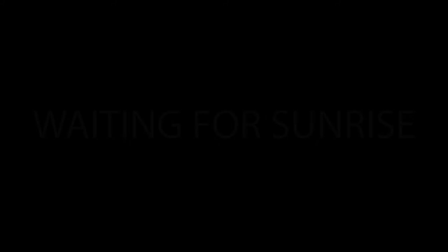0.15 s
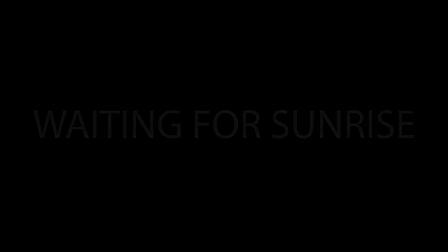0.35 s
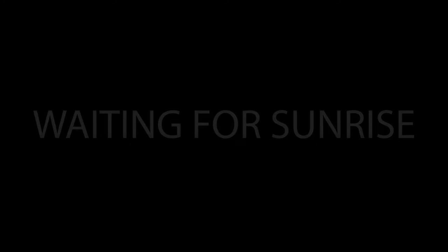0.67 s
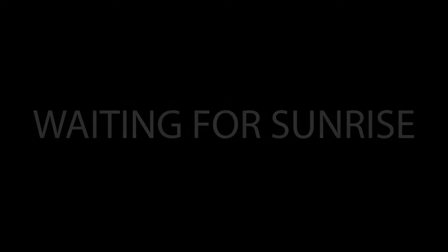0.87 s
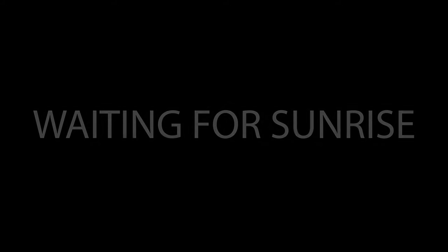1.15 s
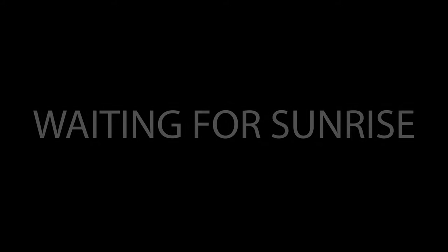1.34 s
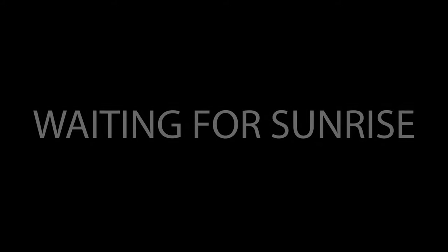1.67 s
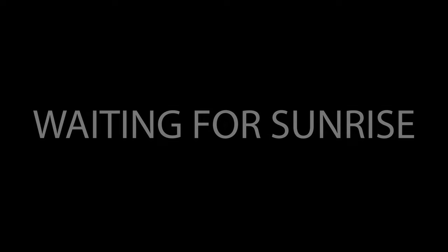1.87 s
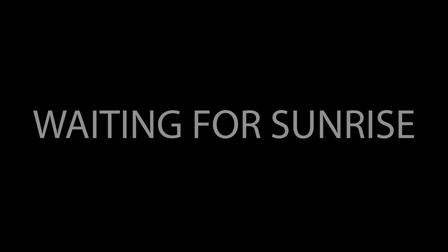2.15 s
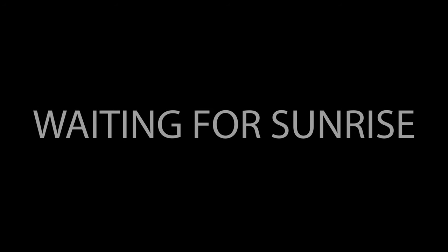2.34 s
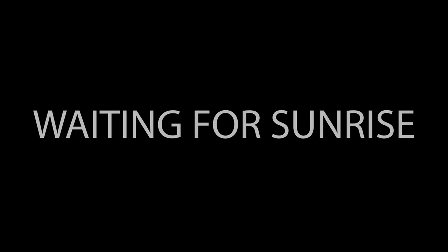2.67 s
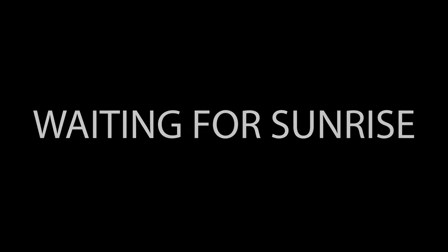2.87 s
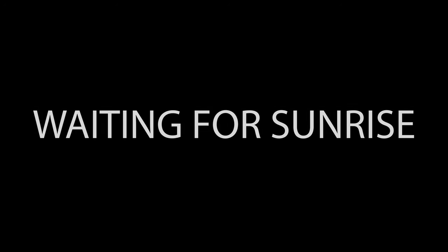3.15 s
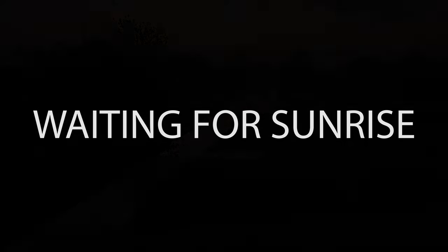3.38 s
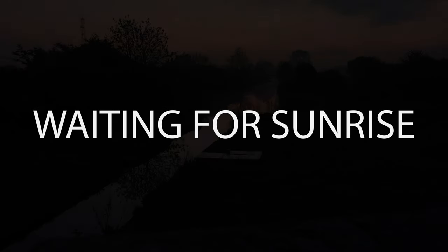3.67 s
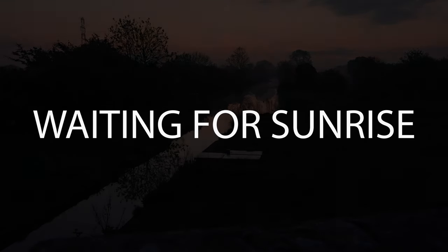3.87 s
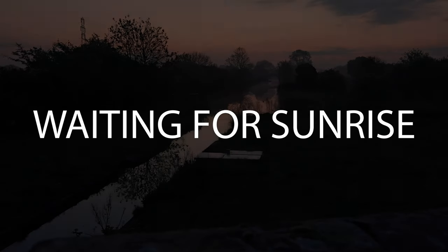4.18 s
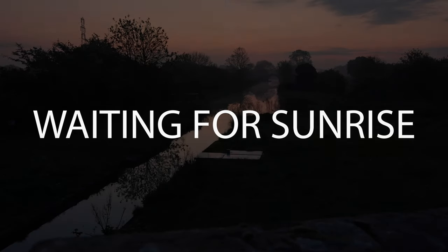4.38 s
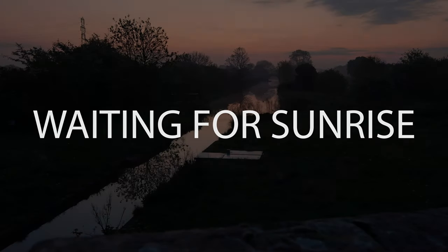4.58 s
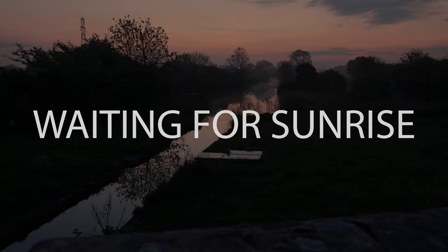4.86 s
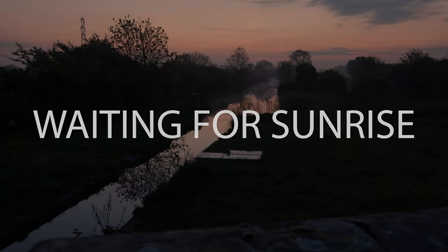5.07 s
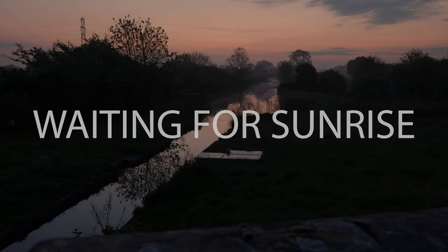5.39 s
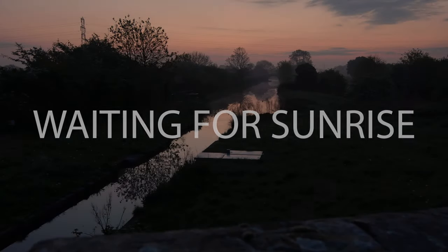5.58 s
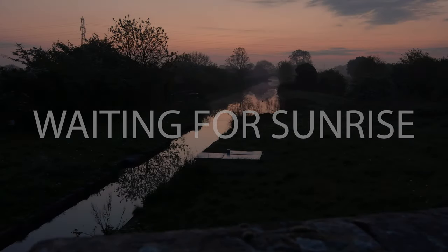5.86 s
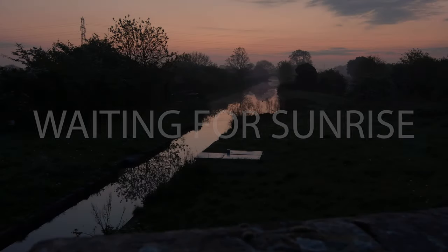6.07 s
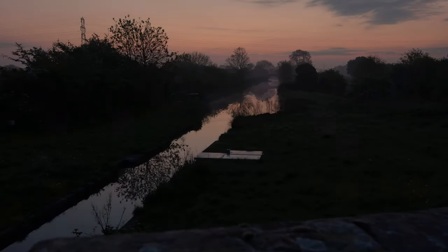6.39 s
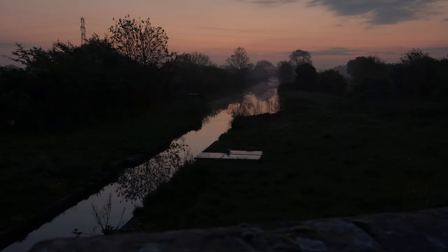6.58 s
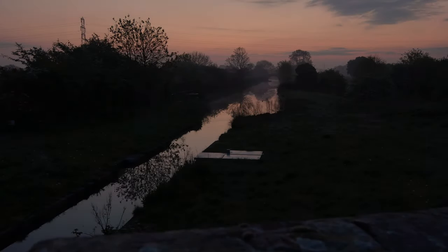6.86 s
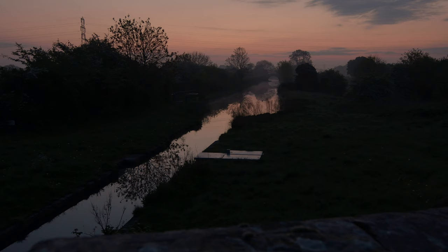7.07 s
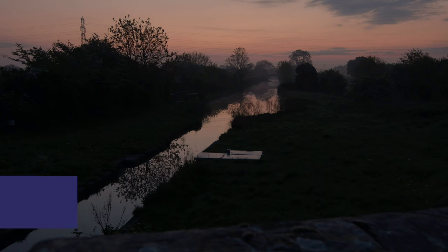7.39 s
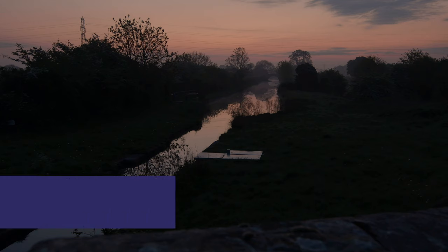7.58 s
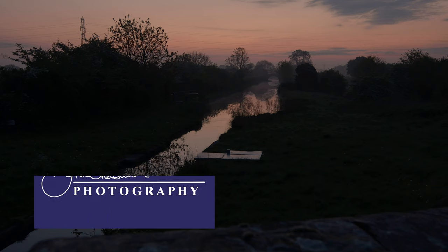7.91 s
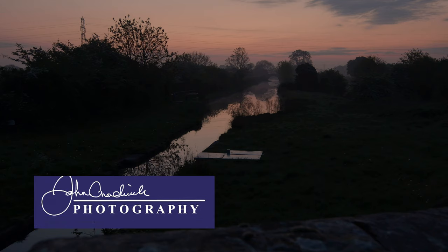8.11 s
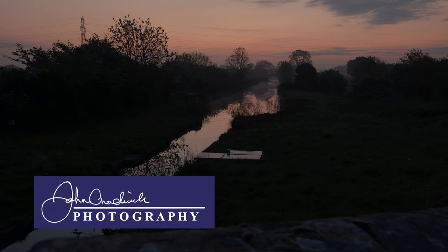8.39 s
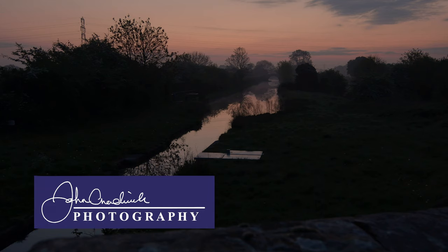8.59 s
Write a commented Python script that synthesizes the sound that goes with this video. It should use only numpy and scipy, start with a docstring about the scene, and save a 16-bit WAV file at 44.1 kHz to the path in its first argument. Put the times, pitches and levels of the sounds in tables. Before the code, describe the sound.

A dense dawn chorus beside a tree-lined canal, lasting nearly nine seconds. From the start, far birds blur together over a quiet low rumble and soft hiss, while a small bird repeats a quick hooked chirp about seven times in the first second. Falling slurs, thin whistles and mellow short notes join. Around 1.6 s a blackbird gives soft fluting notes; from 2 to 3 s a robin adds very high, thin arched figures. The tangle thickens from 3.5 to 4.7 s with clearer, louder blackbird scoops and warbles. Near 5 s the robin utters two fast, complex, wide-swinging phrases. From 5.3 to 7.5 s the chorus is somewhat sparser, with scattered whistles and warbles. At 7.8 s the blackbird returns strongly, warbles around 8.4 s, and ends near 8.7 s in a brief reedy squeak. Woodland reverberation softens everything; rumble and hiss grow slightly, then hold.

```python
"""Dawn chorus by a canal. From the start far birds blur together among trees, over rumble and hiss that rise slowly.
Small birds repeat hooked syllables, then slurs, amid mellow, thin and warbled notes: all are gliding tones.
From 1.6 s a blackbird flutes in scooped notes; from 2 s a robin throws thin arched figures.
About 5 s the robin sings with two voices at once; the blackbird returns near 8 s and ends in a reedy squeak.
The near voices are also heard as scatter from twigs and trees, made by convolution with decaying noise."""
import sys
import numpy as np
from scipy import signal
from scipy.fft import rfft, irfft, next_fast_len
from scipy.io import wavfile
from scipy.ndimage import uniform_filter1d, map_coordinates

SR = 44100
rng = np.random.default_rng(int(sys.argv[2]) if len(sys.argv) > 2 else 0)


def transcribe(signal):
    """Save signal, clipped to [-1, 1], as a 16-bit WAV file at the path in sys.argv[1]."""
    frames = np.atleast_2d(signal).T
    limited = np.clip(frames, -1, 1)
    pcm = np.round(limited * 32767).astype(np.int16)
    wavfile.write(sys.argv[1], SR, pcm)


N = 385434

# Levels of the singers are those before the gains in scene().
# Blackbird notes, scooping up to a crest and dropping away: t/s, rise/s, fall/s, start f/Hz, crest f/Hz,
# end f/Hz, lateness of the drop (a power), level at the crest/dB
BLACKBIRD_NOTES = [(1.612, 0.01, 0.12, 2220, 2182, 2100, 1.14, -38),
                   (1.74, .04, 0.064, 1986, 2194, 1500, 0.79, -41),
                   (3.635, .185, 0.017, 1300, 1835, 1870, 2, -33),
                   (3.988, 0.08, .083, 1830, 2087, 1886, 2.47, -28),
                   (4.452, .1, 0.012, 1483, 2053, 2070, 2, -36.5),
                   (4.556, .122, .085, 2050, 2230, 953, 1.1, -27),
                   (7.81, 0.043, 0.025, 1650, 2020, 1840, 2, -30),
                   (7.925, 0.026, 0.11, 2058, 2147, 2000, 2.74, -24.5),
                   (8.335, .02, 0.042, 2326, 2397, 2124, 1.45, -25)]
SCOOP_POWER = 2.2  # how early a scoop levels off
EFFORT_DB_PER_OCTAVE = 31.5  # the voice weakens below the crest
BLACKBIRD_EDGE_S = 0.01  # attack and release

# Reedy squeak that ends the blackbird's song: t/s, fundamental f/Hz, level/dB
SQUEAK_TRACK = [(8.65, 1070, -62), (8.656, 1182, -35.5), (8.668, 1476, -34), (8.68, 1656, -28),
                (8.695, 1684, -26), (8.712, 1545, -26), (8.724, 1380, -44), (8.738, 1282, -37)]
# Harmonics of the squeak: multiple of the fundamental, relative level/dB
SQUEAK_PARTIALS = [(1, -24), (2, -0.5), (3, -22), (4, -21), (5, -29.5), (6, -35)]

# Robin figures, swinging in flat-topped arches: t/s, length/s, first arch/s, foot f/Hz, top f/Hz,
# final quiver/Hz, quiver rate/Hz, level at the foot/dB, level at the top/dB
ROBIN_FIGURES = [(1.979, 0.048, 0.05, 6600, 7800, 2, 80, -45, -46.5),
                 (2.102, 0.17, 0.17, 7000, 8450, 0, 80, -45, -59.5),
                 (2.364, 0.18, 0.17, 7100, 8400, 0, 80, -46, -59),
                 (2.696, 0.11, 0.054, 6750, 8260, 0, 80, -42, -50),
                 (2.693, 0.075, .075, 9200, 10900, 0, 80, -52, -60),
                 (2.881, 0.11, 0.039, 6780, 8200, 450, 135, -37.5, -52.5),
                 (4.955, 0.076, .038, 3680, 8350, 801, 88, -35.5, -40),
                 (5.089, 0.0775, .038, 3910, 8300, 800, 87, -38.5, -40)]
ARCH_FLATNESS, ARCH_SLOWING = 1.6, 0.87  # squareness; power of time
ARCH_SINK = 0.056  # share of the top pitch lost from arch to arch
# Onsets at which the other side of the robin's syrinx joins in: t/s
TWO_VOICED_ONSETS = [4.941, 5.077]
# Notes of that other side: t from onset/s, length/s, middle f/Hz, scoop as share of pitch, level/dB
UNDERSONG = [(0, 0.0217, 2163, 0.585, -41), (0.027, 0.014, 6460, 0.12, -44), (0.041, .023, 3200, .32, -40)]

# Mellow notes of thrush-sized birds: t/s, length/s, middle f/Hz, glide/Hz, level/dB
FLUTE_NOTES = [(.495, 0.19, 2270, -500, -55.5), (.88, 0.13, 3150, 5, -64), (1.771, 0.09, 1573, -190, -49.5),
               (1.947, 0.12, 1963, 282, -46.5), (2.022, 0.039, 2185, -39, -43),
               (2.16, 0.097, 2230, -500, -45.5), (2.151, .13, 3224, 6, -46.5),
               (2.345, 0.083, 3160, 103, -43.5), (2.465, 0.15, 1843, 190, -49.5),
               (2.63, .036, 2384, -80, -46.5), (2.716, 0.087, 2557, 243, -48.5),
               (2.82, 0.062, 2427, 7, -46), (3.21, 0.19, 1785, 480, -53), (3.51, 0.068, 3350, -350, -47.5),
               (3.551, 0.12, 2725, -160, -49.5), (3.559, 0.14, 2113, 3, -49.5),
               (3.819, 0.1, 2550, 614, -40), (3.916, 0.099, 2757, -260, -40), (4.155, .03, 2700, -350, -42),
               (4.35, .045, 3470, 147, -50.5), (4.435, 0.026, 1923, 320, -40.5),
               (4.7, 0.06, 3115, 160, -48.5), (4.875, .035, 3100, -390, -45.5),
               (4.915, 0.042, 3590, 52, -47), (5.255, 0.091, 2194, -480, -52),
               (5.371, 0.055, 3200, -220, -43.5), (5.485, .024, 3660, 0, -49),
               (5.598, .125, 2537, 256, -43.5), (5.706, .1, 2114, -550, -53.5),
               (5.795, 0.048, 3280, 248, -46.5), (5.98, .056, 3095, -190, -47.5),
               (6.1, 0.15, 2243, -2, -52), (6.2, 0.17, 1466, -100, -61.5),
               (6.422, 0.032, 3200, -550, -48.5), (6.548, 0.067, 3570, -500, -48),
               (6.891, 0.072, 1940, 507, -47), (7.022, 0.052, 1980, 214, -42), (7.18, .12, 1958, -300, -42),
               (7.469, 0.07, 1705, 120, -46.5), (7.614, 0.077, 1985, -110, -41.5),
               (8.196, .12, 2430, 61, -50.5), (8.3, 0.09, 1696, 224, -49)]
# Thin notes of small birds: t/s, length/s, middle f/Hz, glide/Hz, level/dB
WHISTLE_NOTES = [(.3, 0.032, 4610, 750, -47.5), (.333, .02, 9800, 2400, -66), (.633, .02, 9800, 2400, -64),
                 (.767, .12, 4980, 143, -54), (1.037, 0.098, 5800, -450, -52.5),
                 (1.121, 0.032, 5100, 600, -48.5), (1.59, .08, 5370, -130, -51),
                 (1.597, 0.065, 6060, -460, -53), (1.585, 0.15, 7270, 77, -47),
                 (1.888, 0.061, 4110, 104, -55.5), (1.96, 0.07, 5030, -200, -57.5),
                 (2.621, 0.13, 5630, -410, -44), (2.733, 0.028, 4860, -700, -45.5),
                 (3.03, 0.058, 6530, 450, -45.5), (3.09, .046, 5900, -1150, -46),
                 (3.546, 0.025, 5900, -250, -46.5), (3.64, 0.046, 4000, 450, -45.5),
                 (3.762, 0.026, 5920, -360, -48.5), (3.844, 0.048, 7080, 0, -41.5),
                 (3.88, 0.14, 7330, 153, -49.5), (3.881, 0.086, 5260, 1790, -49),
                 (4.01, 0.1, 4115, 0, -45.5), (4.18, .05, 5450, 1700, -55), (4.186, 0.09, 4274, 35, -42.5),
                 (4.315, 0.044, 5450, 130, -50.5), (4.4, 0.081, 4320, -140, -41.5),
                 (5.282, 0.13, 7470, -290, -56.5), (5.58, 0.087, 5670, 400, -59.5),
                 (6.063, 0.068, 7150, -300, -59), (6.203, 0.15, 7500, 97, -59),
                 (6.448, .14, 7520, -170, -59), (6.682, 0.14, 7270, -320, -60.5),
                 (6.875, 0.11, 5480, -180, -49), (7.01, .1, 5870, -350, -61.5),
                 (7.371, .08, 6280, 252, -52.5), (8.324, .063, 7350, -650, -54.5),
                 (8.33, 0.13, 8750, -800, -64.5), (8.51, 0.099, 4980, -220, -46),
                 (8.676, 0.07, 6900, 358, -49.5)]
# Warbled notes: t/s, length/s, base f/Hz, glide/Hz, level/dB, upward swing/Hz, swing rate/Hz,
# pulsing either side of the level/dB
TRILL_NOTES = [(.048, .12, 1800, 0, -54, 900, 59, 2), (.09, .07, 2650, -300, -50, 600, 70, 4),
               (1.371, .19, 1830, 165, -47.5, 190, 46, 7), (2.06, .1, 2360, 120, -42, 120, 50, 4),
               (2.735, .055, 7300, 600, -50, 1100, 130, 4), (3.318, .049, 4100, 0, -45, 1600, 75, 0),
               (3.557, .09, 7140, 280, -52, 1020, 36, -3), (3.683, .11, 7000, -200, -49.5, 350, 55, -6),
               (3.868, .087, 6635, -30, -41.5, 170, 71, 0), (3.935, .0593, 1715, -165, -35, 750, 45, 8),
               (4.18, .1, 2200, -200, -43, 416, 40, 3), (4.48, .12, 2760, 0, -49, 804, 66, 4),
               (5.504, .12, 2405, 105, -46, 121, 83, 6.5), (6.155, .086, 2900, -400, -46.5, 589, 38, 3.5),
               (6.33, .5, 7650, -600, -64, 900, 17, 3), (7.45, .11, 7350, -500, -59, 700, 28, 2),
               (6.706, .062, 2510, -280, -44, 513, 26, 1), (6.949, .075, 1715, -270, -47.5, 650, 59, 5),
               (7.539, .095, 1700, 0, -54, 998, 37, 14), (7.695, .063, 1590, -60, -39, 444, 29, 1),
               (7.746, .064, 1490, -65, -42, 1446, 42, 4), (8.128, .042, 1785, -125, -34, 130, 42, 6),
               (8.174, .052, 1680, -200, -35.5, 90, 47, 3.5), (8.376, .094, 1985, -70, -29.5, 800, 34.5, 1),
               (8.465, .106, 1935, -30, -29.5, 820, 30.5, -1)]

# One small bird repeats a hooked syllable at a steady pace.
HOOK_START_S, HOOK_PERIOD_S, HOOK_LENGTH_S = 0.011, 0.138, 0.073
HOOK_TOP_HZ, HOOK_END_HZ, HOOK_CREST_S, HOOK_FALL_S = 6960, 3480, 0.01, 0.042
HOOK_DB, HOOK_FADE_DB = -52, 6  # down to the middle of the fall; lost towards the end
# Falling slurs: t/s, length/s, start f/Hz, level/dB
SLUR_NOTES = [(0.414, 0.072, 5560, -52.5), (1.229, 0.049, 6330, -45.5), (1.336, .036, 5930, -56),
              (1.411, 0.055, 6130, -48.5), (1.484, 0.032, 5900, -57), (3.983, 0.032, 5900, -52),
              (4.066, .036, 5900, -59), (4.11, .036, 5840, -48), (4.42, .036, 5930, -53),
              (4.533, 0.047, 5880, -50), (4.639, .036, 5840, -50.5), (4.747, 0.038, 5900, -51.5),
              (4.851, .036, 5960, -50), (5.177, 0.032, 5900, -51), (5.297, .088, 4930, -47),
              (5.476, 0.12, 5550, -52.5), (5.903, 0.033, 5900, -54), (6.037, 0.032, 5800, -55.5),
              (6.382, 0.034, 6180, -48.5), (7.453, 0.036, 6000, -50.5), (7.527, 0.038, 5950, -53.5),
              (8.185, 0.11, 5120, -47)]
SLUR_OCTAVES = 0.53  # every slur falls this far

# Reverberation of the trees before the factor "reach": f/Hz, decay time t60/s
TREE_DECAY = [(1500, 1.75), (4000, 0.76), (8000, 0.79)]
# Far chorus, before register trims: t/s, mellow level/dB, middle level/dB, twittering level/dB, thin level/dB
CHORUS_LEVELS = [(0.0, -47, -56.5, -58, -61), (1.17, -55, -56.5, -58, -56.5), (1.68, -52, -54, -57, -64),
                 (2.29, -46, -56, -64, -61.5), (2.94, -44.5, -51, -52.5, -54),
                 (3.6, -47.5, -47.5, -53, -54.5), (3.92, -39.5, -51.5, -56, -57),
                 (4.18, -43.5, -49.5, -52.5, -58.5), (5.33, -49, -52, -59.5, -59),
                 (7.45, -49, -51.5, -61, -71.5), (7.81, -45, -49.5, -49.5, -63.5),
                 (8.74, -46, -52.5, -62, -52.5)]
# Very high far calls: t/s, level/dB
HIGHEST_LEVEL = [(0, -90), (2, -75), (3.2, -66), (4.3, -71), (5.5, -92), (7.4, -83), (8.3, -67)]

# Far rumble, before a small trim: t/s, level/dB
RUMBLE_LEVEL = [(0.0, -60.5), (3.48, -54), (8.74, -53.5)]
# Microphone hiss, before a trim: t/s, level/dB
HISS_LEVEL = [(0.0, -74), (3.72, -67), (8.74, -66.5)]
# Spectral shape of the rumble: f/Hz, relative level per Hz/dB
RUMBLE_SPECTRUM = [(12, -52), (30, -19), (45, -4), (60, 1), (85, -0.5), (160, 1.5), (450, 1), (950, -1.5),
                   (1300, -7.5), (2000, -3), (9000, -75)]
# Spectral shape of the hiss: f/Hz, relative level per Hz/dB
HISS_SPECTRUM = [(20, -7), (1500, -75), (3000, -29), (6000, 10.5), (10000, 9), (16000, 8)]
TOP_HZ = 15800  # band limit


def amp(db):
    """Decibel law: a level difference becomes an amplitude ratio."""
    return 10 ** (np.asarray(db) / 20)


def unit(x):
    """Normalisation by mean power, giving rms 1."""
    return x / np.sqrt(np.mean(x ** 2) + 1e-20)


def along(points, hz):
    """Interpolation of (f/Hz, value) points on a logarithmic frequency axis."""
    f, v = np.transpose(points)
    return np.interp(np.log(hz + 1), np.log(f + 1), v)


def curves(rows):
    """Linear interpolation in time: one value per sample for each column after t/s."""
    s, *columns = np.transpose(rows)
    t = np.arange(N) / SR
    return [np.interp(t, np.sort(s), column) for column in columns]


def wobble(rate, size=N):
    """Slow random fluctuation: a smooth curve through random knots, rate knots a second."""
    knots = rng.standard_normal(int(size * rate / SR) + 4)
    return map_coordinates(knots, [np.arange(size) * rate / SR])


def filtered(x, response):
    """Linear filtering: the spectrum is multiplied by a response of frequency."""
    m = next_fast_len(N + 8192)
    return irfft(rfft(x, m) * response(np.fft.rfftfreq(m, 1 / SR)), m)[..., :N]


def noise(spectrum, side_db):
    """Coloured noise of rms 1; an independent side signal decorrelates the two channels."""
    mid, side = filtered(rng.standard_normal((2, N)), lambda hz: amp(along(spectrum, hz)))
    side = amp(side_db) * side
    return unit(np.array([mid + side, mid - side]))


def add(track, s, x):
    """Superposition: x is summed into the track from time s."""
    part = track[max(0, int(s * SR)):][:len(x)]
    part += x[:len(part)]


def syrinx(hz, db, overtone_db=-42):
    """Phase is the integral of frequency: a nearly pure tone whose faint octave weakens as pitch climbs."""
    phase = 2 * np.pi * np.cumsum(hz) / SR
    octave = amp(overtone_db) * np.sin(2 * phase) / (1 + (hz / 6500) ** 4)
    return np.sqrt(2) * amp(db) * (np.sin(phase) + octave)


def note(hz, db, edge, waver=0.0056, overtone_db=-25):
    """Frequency and amplitude modulation: one slightly unsteady syllable with soft ends."""
    t = np.arange(len(hz)) / SR
    gate = np.sin(np.pi / 2 * np.clip(np.minimum(t, t[-1] - t) / edge, 0, 1))
    unsteady_hz = hz * (1 + waver * wobble(171.3, len(hz)))
    return gate * syrinx(unsteady_hz, db, overtone_db)


def blackbird_song():
    """Vocal effort rises with pitch: each note scoops to its crest and drops, loudest where highest."""
    out = np.zeros(N)
    for s, rise, fall, start, crest, end, lateness, db in BLACKBIRD_NOTES:
        t = np.arange(int((rise + fall) * SR)) / SR
        scoop = np.clip(1 - t / rise, 0, 1) ** SCOOP_POWER
        drop = np.clip((t - rise) / fall, 0, 1) ** lateness
        hz = crest + (start - crest) * scoop + (end - crest) * drop
        effort_db = EFFORT_DB_PER_OCTAVE * np.log2(hz / crest)
        flutter_db = 0.5 * wobble(70, len(t))
        sound = note(hz, db + effort_db + flutter_db, BLACKBIRD_EDGE_S, waver=0.0065, overtone_db=-33)
        add(out, s, sound)
    return out


def squeak():
    """Harmonic series on a rough, jittering fundamental; the second partial dominates."""
    hz, db = curves(SQUEAK_TRACK)
    hz = hz * (1 + 0.0123 * wobble(400))
    begun = np.arange(N) / SR > SQUEAK_TRACK[0][0]
    return begun * sum(syrinx(k * hz, db + level) for k, level in SQUEAK_PARTIALS)


def robin_song(coupling_db=-17):
    """Two coupled sound sources: one side of the syrinx sings arches, the other scoops; each modulates the other."""
    upper, lower = np.zeros((2, N))
    for s, length, arch, foot, top, quiver, rate, foot_db, top_db in ROBIN_FIGURES:
        t = np.arange(int(length * SR)) / SR
        turns = (t / arch) ** ARCH_SLOWING
        height = np.tanh(ARCH_FLATNESS * np.sin(np.pi * turns) ** 2) / np.tanh(ARCH_FLATNESS)
        sinking_top = top * (1 - ARCH_SINK * (turns - 0.5))
        growing_quiver = quiver * (t / length) ** 2 * np.cos(2 * np.pi * rate * t)
        hz = foot + (sinking_top - foot) * height + growing_quiver
        db = foot_db + (top_db - foot_db) * height
        # louder is richer
        add(upper, s, note(hz, db, edge=0.01, waver=0.0072, overtone_db=db + 26.5))
    for onset in TWO_VOICED_ONSETS:
        for s, length, pitch, scoop, db in UNDERSONG:
            u = np.linspace(-1, 1, int(length * SR))
            hz = pitch * (1 + scoop * u * u)
            add(lower, onset + s, note(hz, db, edge=0.0028, waver=0.0095, overtone_db=-2))
    power = uniform_filter1d(upper ** 2 + lower ** 2, size=200)
    strength = np.sqrt(np.abs(power) + 1e-8)
    return upper + lower + amp(coupling_db) * upper * lower / strength


def arcs(rows, bow, swell_db, hump_db, flutter_db):
    """Parabolic frequency glides: notes bow upward in the middle while their level changes a little."""
    out = np.zeros(N)
    for s, length, pitch, glide, db in rows:
        u = np.linspace(-1, 1, int(max(length, 0.01) * SR))
        hz = pitch * (1 - bow * u * u) + glide * u / 2
        shape_db = swell_db * u + hump_db * (1 / 3 - u * u) + flutter_db * wobble(63.4, len(u))
        add(out, s, note(hz, db + shape_db, edge=min(0.012, length / 5)))
    return out


def trills(dryness=0.55, loudest=0.38, pace_drift=0.9):
    """Periodic frequency and level modulation: pitch flicks up each cycle; also returns what feeds the foliage."""
    out, stray = np.zeros((2, N))
    for s, length, pitch, glide, db, swing, rate, pulsing_db in TRILL_NOTES:
        t = np.arange(int(length * SR)) / SR
        turns = rate * t + pace_drift * t * wobble(14, len(t))  # long warbles lose their pace
        flick = (1 - np.abs(np.cos(np.pi * turns))) ** 1.7
        flick = flick * (1 + 0.197 * wobble(36, len(t)))
        hz = pitch + glide * (t / length - 0.5) + swing * flick
        pulse_db = pulsing_db * np.cos(2 * np.pi * (turns - loudest))
        sound = note(hz, db + pulse_db, edge=0.0077)
        add(out, s, sound)
        # a louder bird is nearer, so less of its sound arrives as echo
        add(stray, s, sound * amp(-dryness * max(0, db + 39.5)))
    return out, stray


def hooks(count):
    """Repetition with random variation: a syllable tips over its crest and falls, again and again."""
    out = np.zeros(N)
    t = np.arange(int(HOOK_LENGTH_S * SR)) / SR
    height = np.exp(-((t - HOOK_CREST_S) / HOOK_FALL_S) ** 2)
    hz = HOOK_END_HZ + (HOOK_TOP_HZ - HOOK_END_HZ) * height
    db = HOOK_DB - HOOK_FADE_DB * np.clip(1 - 2 * height, 0, 1)
    for k in range(count):
        varied_hz = hz * (1 + 0.021 * rng.standard_normal())
        varied_db = db + 3.3 * wobble(87, len(t))
        add(out, HOOK_START_S + k * HOOK_PERIOD_S, note(varied_hz, varied_db, edge=0.0044))
    return out


def slurs():
    """Exponential frequency glide: quick even falls through the same musical interval."""
    out = np.zeros(N)
    for s, length, start, db in SLUR_NOTES:
        u = np.linspace(0, 1, int(length * SR))
        hz = start * 2 ** (-SLUR_OCTAVES * u)
        add(out, s, note(hz, db + 2 * wobble(80, len(u)), edge=0.0038, waver=0.0085))
    return out


def trees(x, reach=0.97, spread=0.004):
    """Multiple scattering from trunks and foliage: a dense tail whose decay time depends on frequency."""
    # reach scales the decay time (small for nearby twigs); spread is the build-up time in s
    hz, t, z = signal.stft(rng.standard_normal(SR), SR, nperseg=256)
    t60 = reach * along(TREE_DECAY, hz)[:, None]
    envelope = amp(-60 * t / t60) * (1 - np.exp(-t / spread))
    tail = signal.istft(z * envelope, SR, nperseg=256)[1]
    return signal.fftconvolve(x, tail / np.linalg.norm(tail))[:N]


def flock(low_hz, high_hz, length, bend, direct_db, count):
    """Incoherent superposition: many random bent notes, blurred by bushes and trees, levelled to near rms 1."""
    out = np.zeros(N)
    draws = rng.random((count, 8))
    for k, (when, pitch, life, size, slope, arch, warble, speed) in enumerate(draws):
        u = np.linspace(-1, 1, int(length * (0.396 + life) * SR))
        quiver_hz = 30 + 70 * speed
        quiver = warble ** 3 * np.sin(2 * np.pi * quiver_hz * np.arange(len(u)) / SR)
        contour = (slope - 0.6) * u + (arch - 0.5) * u * u + 0.41 * quiver
        hz = low_hz * (high_hz / low_hz) ** pitch * np.exp(bend * contour)
        start_s = max(0, (k + when - 4) / count * N / SR)
        add(out, start_s, syrinx(hz, 12 * size) * np.sqrt(1 - u * u))
    out = trees(out) + trees(out, reach=0.12) + amp(direct_db) * out
    power = uniform_filter1d(out ** 2, size=SR // 4)
    return out / np.sqrt(np.abs(power) + 1e-6)


def far_chorus():
    """Sum of frequency bands: four registers of far singers wax and wane under a few very high calls."""
    mellow_db, middle_db, twitter_db, thin_db = curves(CHORUS_LEVELS)
    highest_db, = curves(HIGHEST_LEVEL)
    mellow = amp(mellow_db - 2.5) * flock(1830, 2700, length=0.09, bend=0.1997, direct_db=4, count=250)
    middle = amp(middle_db) * flock(2850, 4250, length=0.055, bend=0.24, direct_db=4.5, count=440)
    twitter = amp(twitter_db - 0.5) * flock(4100, 5600, length=0.03, bend=0.238, direct_db=2, count=560)
    thin = amp(thin_db - 1.5) * flock(5750, 7500, length=0.05, bend=0.121, direct_db=3, count=280)
    highest = amp(highest_db) * flock(8200, 10500, length=0.05, bend=0.135, direct_db=10, count=110)
    return mellow + middle + twitter + thin + highest


def background():
    """Stationary noise under slow gain: far rumble with a wavering hum, and hiss that differs between the ears."""
    rumble_db, = curves(RUMBLE_LEVEL)
    hiss_db, = curves(HISS_LEVEL)
    rumble = amp(rumble_db + 0.12) * noise(RUMBLE_SPECTRUM, side_db=-14.5)
    hum = syrinx(199 + 2.4 * wobble(5), rumble_db - 17 + 4 * wobble(2.076))
    hiss = amp(hiss_db + 8.5) * noise(HISS_SPECTRUM, side_db=-2)
    return rumble + hum + hiss


def scene():
    """Superposition of paths: singers are heard directly, through nearby twigs and by way of the trees."""
    blackbird = blackbird_song() + squeak()
    robin = robin_song()
    flutes = arcs(FLUTE_NOTES, bow=0.0277, swell_db=0.8, hump_db=1, flutter_db=0.43)
    whistles = arcs(WHISTLE_NOTES, bow=0.0201, swell_db=-0.7, hump_db=-0.5, flutter_db=0)
    warbles, stray = trills()
    series = hooks(count=7) + slurs()

    direct = amp(1) * blackbird + robin + warbles
    direct = direct + amp(3) * flutes + amp(1.5) * whistles + amp(0.8) * series

    to_twigs = amp(-24) * blackbird + amp(-8.5) * robin
    to_twigs = to_twigs + amp(-7) * (stray + flutes + whistles) + amp(-5.5) * series

    to_trees = amp(-15) * blackbird + amp(-14) * robin + amp(-13) * stray
    to_trees = to_trees + amp(-7) * flutes + amp(-3) * whistles + amp(-5) * series

    near = direct + trees(to_twigs, reach=0.12, spread=0.0014) + trees(to_trees)
    return near + far_chorus() + background()


def record(dry):
    """Ideal low-pass filtering: nothing is kept above the band limit."""
    return filtered(dry, lambda hz: hz < TOP_HZ)


dry = scene()
out = record(dry)
transcribe(out)
```